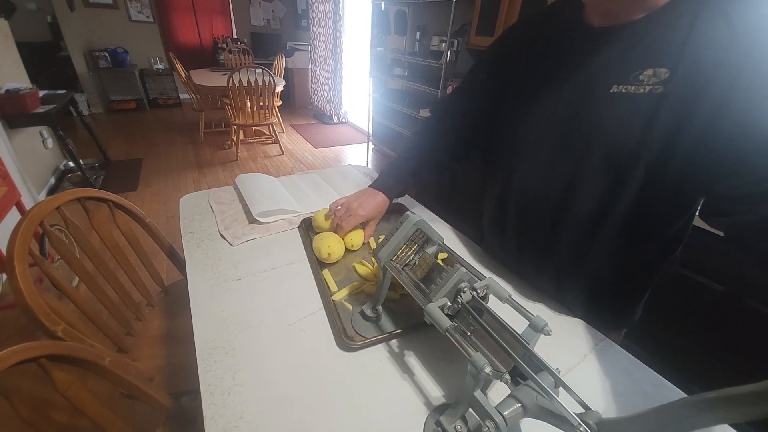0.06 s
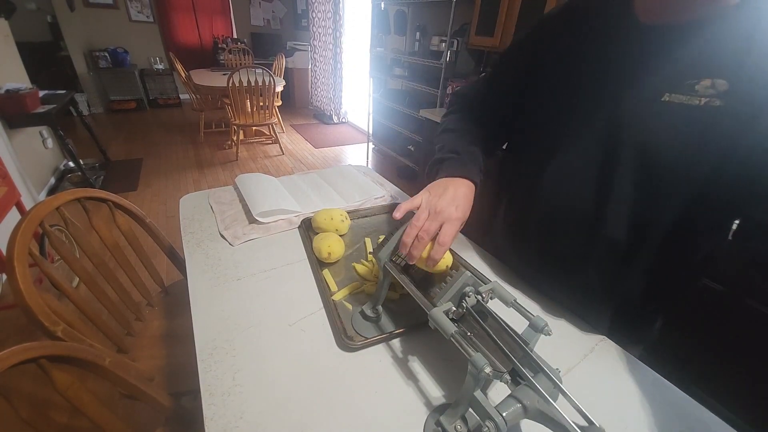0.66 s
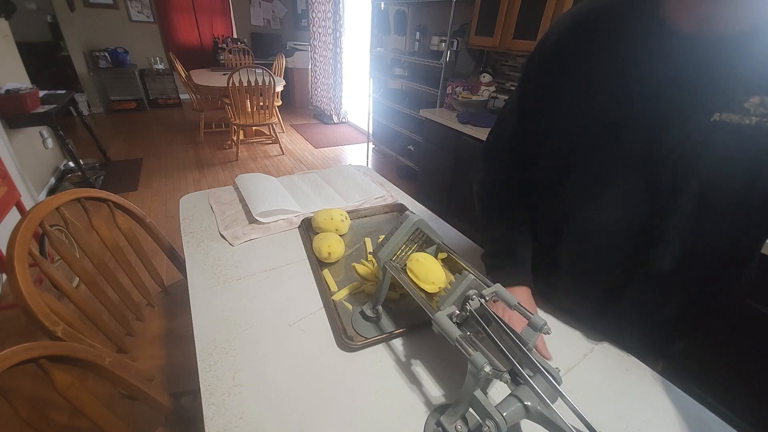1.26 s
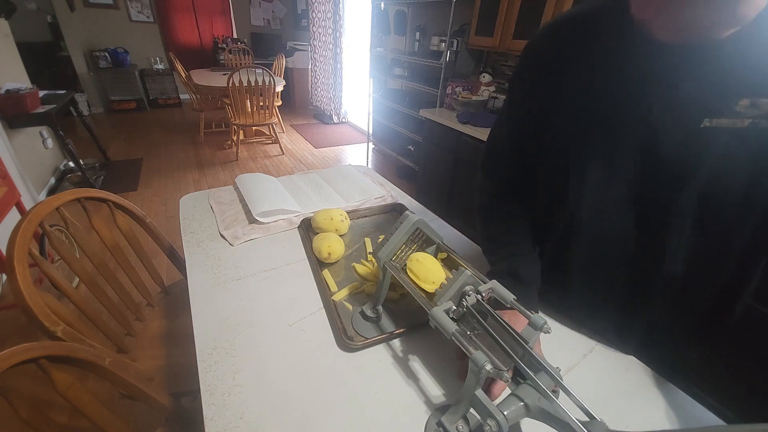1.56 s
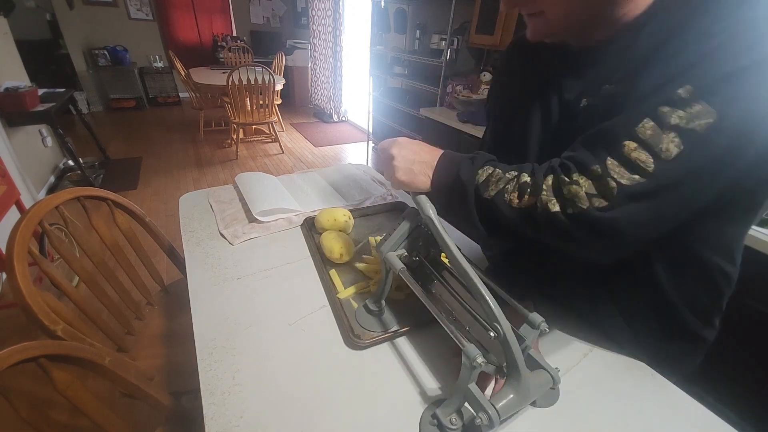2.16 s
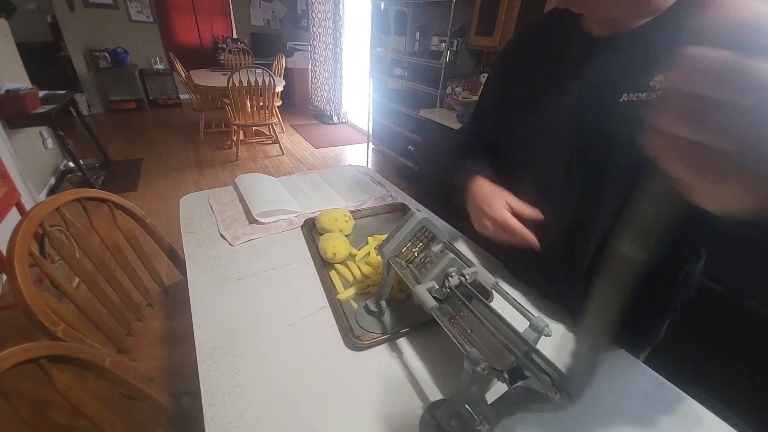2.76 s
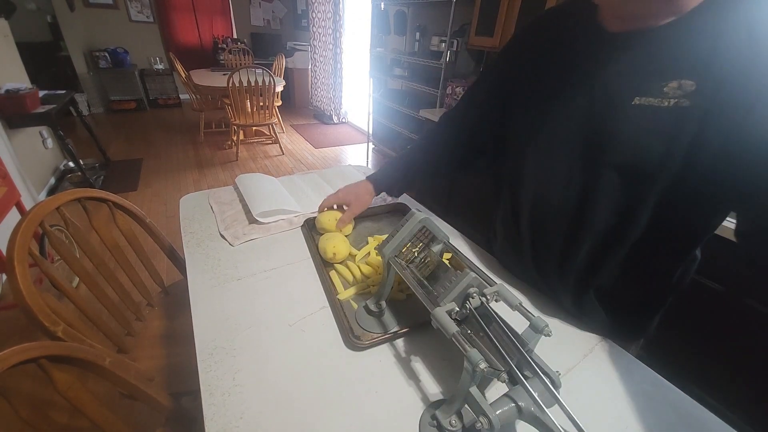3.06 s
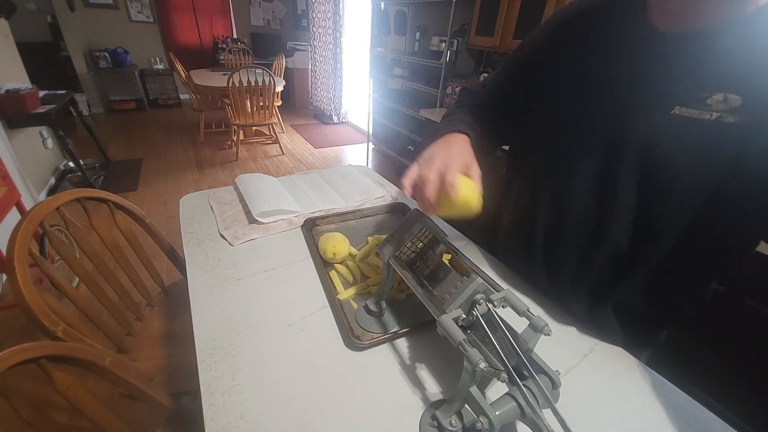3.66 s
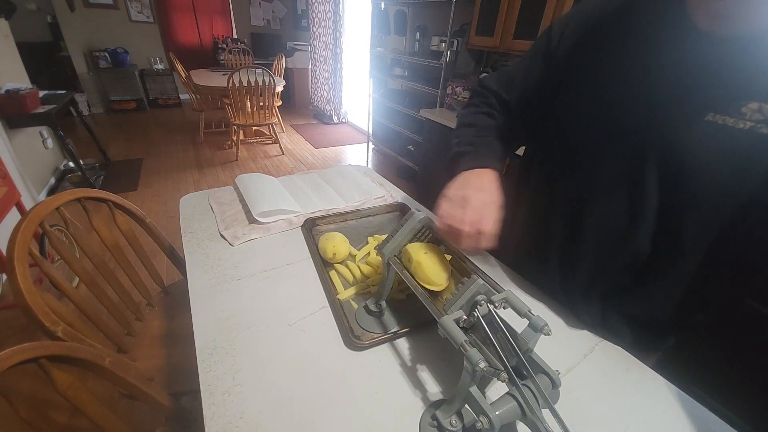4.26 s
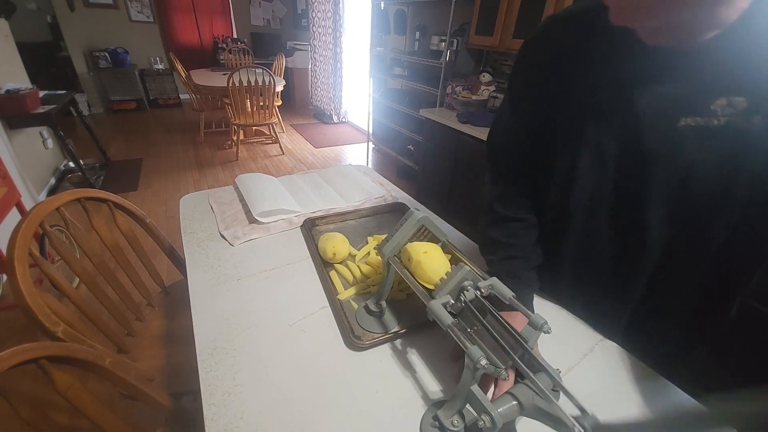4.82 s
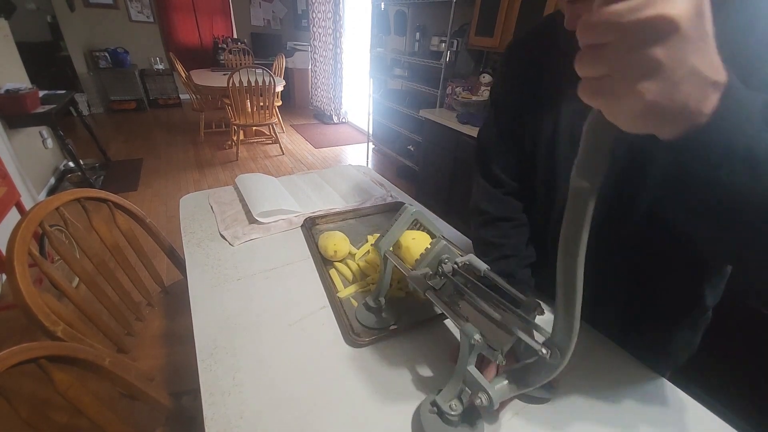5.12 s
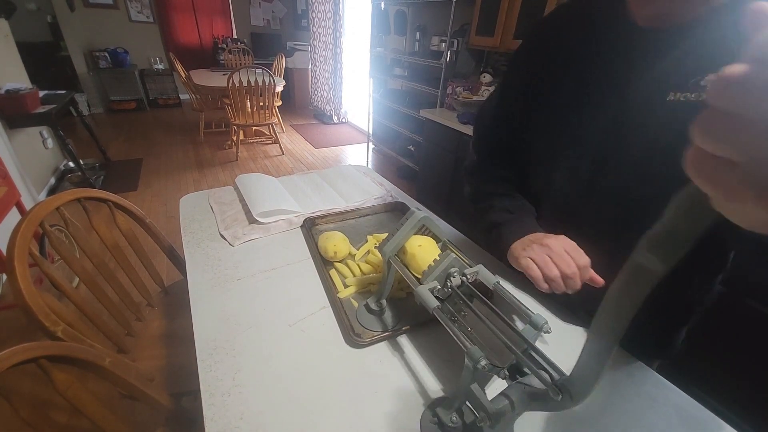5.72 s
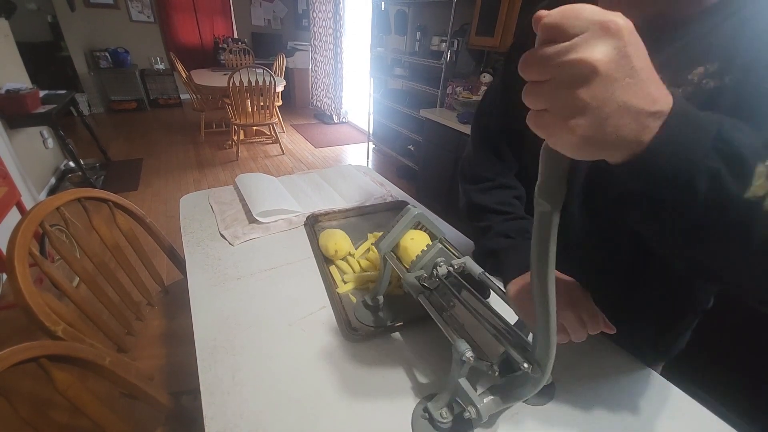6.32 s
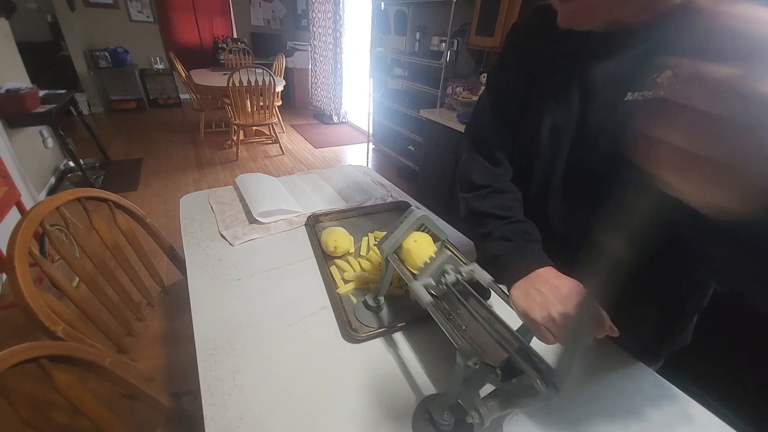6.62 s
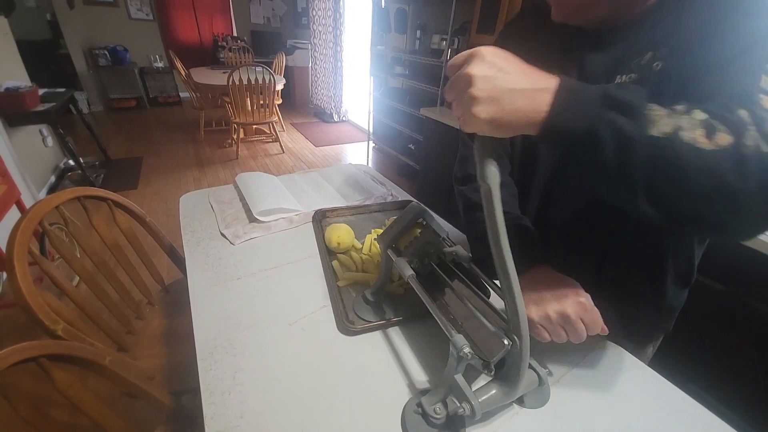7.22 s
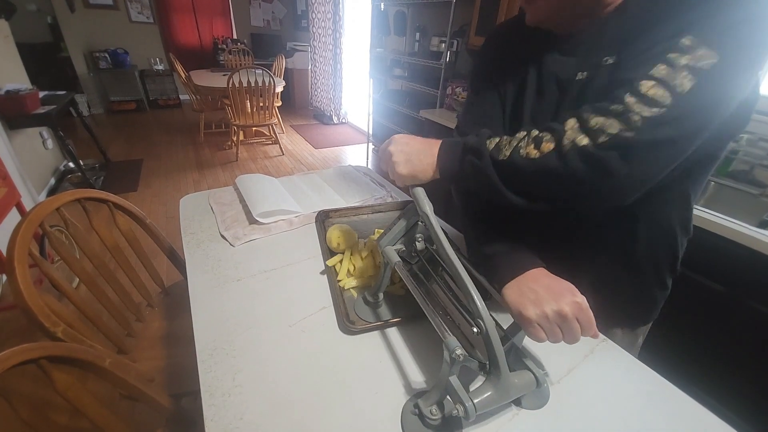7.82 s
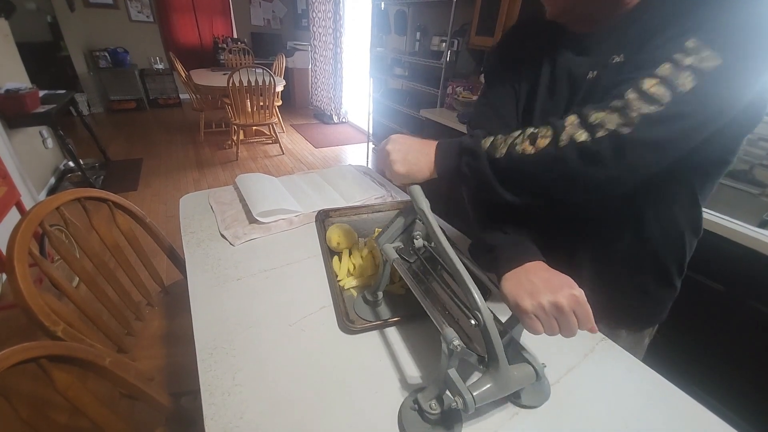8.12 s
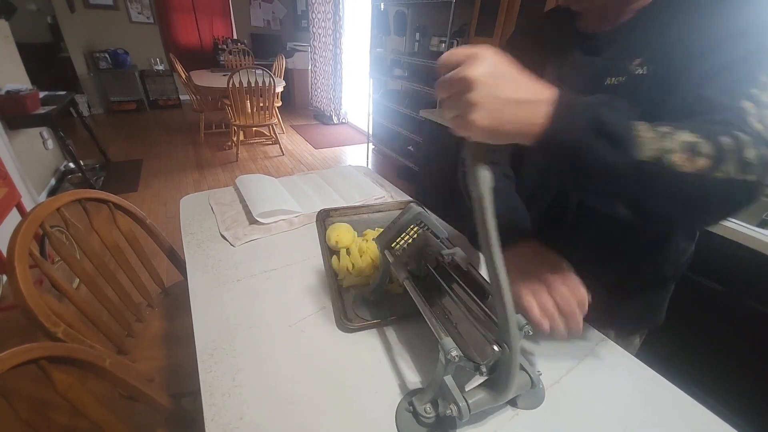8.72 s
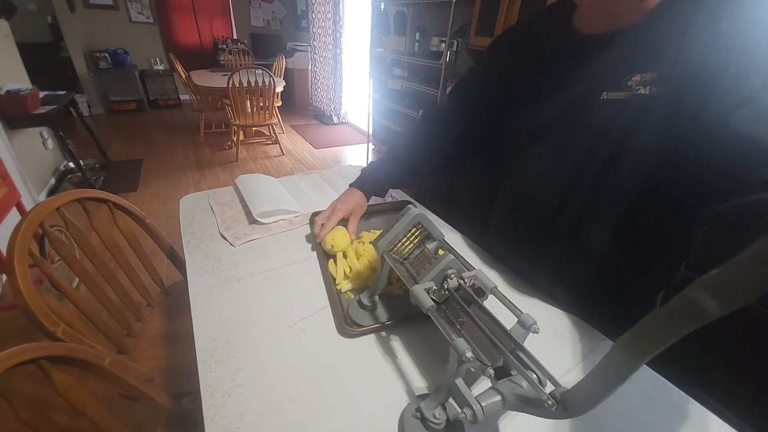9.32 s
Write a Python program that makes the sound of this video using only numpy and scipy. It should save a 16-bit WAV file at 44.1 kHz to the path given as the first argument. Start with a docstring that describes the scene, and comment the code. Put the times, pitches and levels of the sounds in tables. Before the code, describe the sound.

A lever cutter chops raw potatoes with dull knocks, one loud crunching thud, then a run of rattling metal clacks in a kitchen.

```python
"""Lever fry cutter on a kitchen table

Potatoes drop into the trough with dull knocks; the pusher slides on its rods and drives them through the
blade grid, the second one only after a run of jerks on the lever. Each jerk clacks the cast frame,
rattles the loose linkage and thumps the table. Heard close up, with a short kitchen tail."""
import sys
import numpy as np
from scipy import signal
from scipy.fft import rfft, irfft, next_fast_len
from scipy.io import wavfile
from scipy.ndimage import map_coordinates

SR = 44100
rng = np.random.default_rng(int(sys.argv[2]) if len(sys.argv) > 2 else 0)


def unload_audio(sound):
    """Save the sound as a 16-bit wav file, at the path given as the first command line argument."""
    columns = np.transpose(np.atleast_2d(sound))
    # keep every value between -1 and 1, then stretch to whole-number steps
    steps = np.round(np.clip(columns, -1, 1) * 32767)
    wavfile.write(sys.argv[1], SR, steps.astype(np.int16))


N = 418068
AGE = np.arange(SR // 2) / SR  # seconds since a blow

# spectrum of steel on steel: f/Hz, level/dB
STEEL_SPECTRUM = [(60, -22.5), (300, 5.5), (650, -7), (1000, 2), (1500, -2.5), (2300, 0), (3100, -8.5),
                  (5000, -14.5), (8500, -16.5), (10500, -22.5), (15500, -17)]
# hard jerks on the lever: t/s, clack/dB, treble/dB, rattle/dB, flex/Hz, table thump/dB
LEVER_JERKS = [(6.351, -16, -8, -6.5, 1775, -13.5), (6.753, -14, -7.5, -10, 1250, -10),
               (7.102, -13.5, -8.5, -4.5, 1820, -14), (7.467, -17, -9, -2, 1994, -14.5),
               (8.135, -20.5, -11.5, -15, 1410, -14.5), (8.429, -19.5, -13.5, -13.5, 1410, -14)]


def amp(db):
    """Decibels to gain."""
    return 10 ** (np.asarray(db) / 20)


def unit(x):
    """Each channel scaled to rms 1."""
    return x / np.sqrt(np.mean(x ** 2, axis=-1, keepdims=True) + 1e-20)


def blow(x):
    """Each channel scaled to the energy of 10 ms at rms 1."""
    return unit(x) * np.sqrt(SR / 100 / x.shape[-1])


def fade(t60):
    """A decay that loses 60 dB in t60 seconds."""
    return np.exp(-np.log(1000) * AGE / t60)


def along(points, hz):
    """A curve of (f/Hz, value) points, read on a log frequency axis."""
    freqs, values = np.transpose(points)
    return np.interp(np.log(hz + 1), np.log(freqs), values)


def colour(x, points):
    """Minimum-phase EQ through (f/Hz, gain/dB) points."""
    size = 2 * next_fast_len(x.shape[-1] // 2 + 2048)
    cepstrum = irfft(np.log(amp(along(points, np.fft.rfftfreq(size, 1 / SR)))))
    cepstrum[1:size // 2] *= 2
    cepstrum[size // 2 + 1:] = 0
    return irfft(rfft(x, size) * np.exp(rfft(cepstrum)), size)[..., :x.shape[-1]]


def add(track, s, sound):
    """Lay a sound into a track at s seconds."""
    start = round(s * SR)
    track[..., start:start + sound.shape[-1]] += sound[..., :N - start]


def wobble(rate):
    """A smooth random curve, rate knots a second."""
    knots = rng.standard_normal(int(N * rate / SR) + 4)
    return map_coordinates(knots, [np.arange(N) * rate / SR])


def grains(rate, size=len(AGE)):
    """Tiny contacts at random moments, about rate a second, as mid and side."""
    return unit((rng.random(size) < rate / SR) * rng.standard_normal((2, size)))


def slips(rate, spectrum):
    """Friction texture: a stream of tiny slips that flickers in strength."""
    return unit(colour(grains(rate, size=N) * amp(1.3 * wobble(130)), spectrum))


def ring(modes, scatter_db, detune):
    """Damped modes, their strength and pitch scattered anew on each strike."""
    out = np.zeros(len(AGE))
    for hz, db, t60 in modes:
        envelope = amp(db + scatter_db * rng.normal()) * fade(t60)
        pitch = hz * (1 + detune * rng.normal())
        out += envelope * np.sin(2 * np.pi * pitch * AGE + rng.uniform(0, 2 * np.pi))
    return out


def gestures(rows, attack_s, release_db_per_s):
    """Envelope of (t/s, length/s, level/dB) movements: each rises, holds and dies away."""
    t, out = np.arange(N) / SR, np.zeros(N)
    for s, length, db in rows:
        rise = np.clip((t - s) / attack_s, 0, 1)
        out += rise * amp(db - release_db_per_s * np.clip(t - s - length, 0, 2))
    return out


def room_tone():
    """Faint, dark air whose level drifts slowly."""
    # spectrum of the quiet kitchen: f/Hz, level/dB
    air_spectrum = [(30, -12), (60, -8), (1000, -25.5), (3200, -37), (15000, -34)]
    return amp(-72 + wobble(0.98)) * unit(colour(rng.standard_normal((2, N)), air_spectrum))


def kitchen(send):
    """The room's tail, mid and side: decaying noise, new for each third of a second of the action."""
    # reverb time: f/Hz, t60/s
    decay_times = [(100, 0.5), (1500, 0.48), (5000, 0.52), (13000, 0.31)]
    out, step, predelay_s = np.zeros((2, N)), SR // 3, 0.006
    for start in range(0, N, step):
        hz, t, noise = signal.stft(rng.standard_normal((2, 2 * SR // 3)), SR, nperseg=256)
        decay = np.exp(-np.log(1000) * t / along(decay_times, hz)[:, None])
        tail = signal.istft(noise * decay, SR, nperseg=256)[1]
        wet = signal.fftconvolve(send[None, start:start + step], tail / np.linalg.norm(tail[0]), axes=1)
        add(out, start / SR + predelay_s, wet)
    return out


def rod_squeaks():
    """A rod sticks and slips in its guide, on the right: a thin wavering tone with weak overtones."""
    # squeaks of the rods: t/s, length/s, level/dB, f/Hz
    squeaks = [(2.98, 0.032, -42, 5155), (3.061, 0.044, -53, 5160), (4.924, 0.016, -27.5, 1952)]
    t, out = np.arange(N) / SR, np.zeros(N)
    for s, length, db, hz in squeaks:
        phase = 2 * np.pi * hz * t + 0.5 * wobble(90)
        tone = sum(amp(-22 * k) * np.sin((k + 1) * phase) for k in range(3))
        out += tone * gestures([(s, length, db)], attack_s=0.027, release_db_per_s=900)
    return out * np.array([[1], [-0.5]])


def pin_clink():
    """A loose steel pin is struck and rings brightly."""
    # modes of the pin: f/Hz, level/dB, t60/s
    pin_modes = [(4247, -3.5, 0.075), (7000, -4, 0.13), (11510, 7.5, 0.14)]
    # strike on the pin: t/s, level/dB
    strikes = [(5.392, -38.5)]
    out = np.zeros((2, N))
    for s, db in strikes:
        ping = np.array([ring(pin_modes, scatter_db=1, detune=0) for _ in range(2)])
        add(out, s, amp(db) * blow(ping))
    return out


def frame_ring(attack_s):
    """The cast frame's ring, mid and side; load and contact point shift it a little each time."""
    # modes of the frame and trough: f/Hz, level/dB, t60/s
    frame_modes = [(866.5, 4, 0.12), (1101, 6.5, 0.12), (1137, -5, .2), (1387, -8.5, .1),
                   (1713, -14.5, 0.21), (1884, -9.5, 0.098), (1990, -8, .1), (2914, -14, 0.17)]
    ringing = np.array([ring(frame_modes, scatter_db=2.5, detune=0.01) for _ in range(2)])
    return ringing * (1 - fade(attack_s))


def friction():
    """Rubbing, sliding, straining and cutting: each drives its own mix of rumble, scrape and hiss."""
    # a hand rubs potatoes over the tray or into the trough: t/s, length/s, level/dB
    rubs = [(0.65, 0.096, -68.5), (0.74, 0.042, -57.5), (1.0, 0.063, -68), (1.33, 0.19, -75),
            (3.16, 0.069, -66), (4.7, 0.12, -56.5), (9.33, 0.14, -60.5)]
    # the pusher runs along its rods: t/s, length/s, level/dB
    slides = [(1.76, 0.089, -52), (1.85, .04, -46), (2.52, 0.33, -53), (2.88, 0.145, -52), (4.87, .12, -48),
              (5.39, 0.122, -52.5), (8.76, 0.31, -50.5), (9.04, 0.036, -34)]
    # the frame groans as the arm leans on the lever: t/s, length/s, rumble/dB, scrape/dB re rumble
    strains = [(6.267, 1.3, -42.5, -5.5), (7.951, 0.43, -47, -5.5)]
    # the blades shear through a potato: t/s, length/s, level/dB
    cuts = [(1.885, 0.32, -35), (4.98, .06, -37.5), (5.09, 0.023, -44), (7.445, 0.069, -30)]
    # low body of the friction: f/Hz, level/dB
    rumble_spectrum = [(25, -16.5), (60, -1), (100, -15), (205, -0.5), (340, -11.5), (1000, -48)]
    # midrange scrape: f/Hz, level/dB
    scrape_spectrum = [(150, -37), (450, -7), (2000, -4), (3000, -14.5), (9000, -38)]
    # wet hiss of potato flesh: f/Hz, level/dB
    hiss_spectrum = [(1500, -27.5), (3500, 4.5), (7000, -4), (8400, 1.5), (10700, -7), (15500, -4)]
    # zing of the dry steel rods: f/Hz, level/dB
    zing_spectrum = [(1500, -25), (4000, -2), (6800, -10.5), (8400, -1.5), (10500, -18), (15500, -18)]

    rub = gestures(rubs, attack_s=0.041, release_db_per_s=130)
    slide = gestures(slides, attack_s=0.022, release_db_per_s=232.5)
    groan = gestures([row[:3] for row in strains], attack_s=0.027, release_db_per_s=34)
    creaks = [(s, length, db + scrape_db) for s, length, db, scrape_db in strains]
    creak = gestures(creaks, attack_s=0.027, release_db_per_s=232.5)
    # after each jerk the potato creeps on into the grid
    creep = gestures([(s, 0, db - 28) for s, db, *_ in LEVER_JERKS], attack_s=0.034, release_db_per_s=67)
    cut = gestures(cuts, attack_s=0.034, release_db_per_s=174.5) + creep
    rumble_gain = amp(-2.5) * cut + amp(-7) * slide + amp(7.5) * rub + groan
    scrape_gain = cut + slide + amp(-3) * rub + creak
    crunch_gain = amp(-5.5) * cut + amp(-10.5) * rub

    judder = amp(1.8 * wobble(50) - 3)
    broad_scrape = slips(1500, scrape_spectrum)
    damped_frame = frame_ring(attack_s=0.00086) * fade(0.035)  # whatever rubs on the frame also damps it
    grinding = unit(signal.fftconvolve(broad_scrape, damped_frame, axes=1)[:, :N])
    crunch = slips(6000, hiss_spectrum) + 0.75 * slips(60, STEEL_SPECTRUM)  # a few fibres snap louder
    zing = amp(-13.5) * slide * slips(6000, zing_spectrum)
    bite = 0.4 * amp(3.9 * wobble(16))  # the contact wanders between broad scrape and the frame's notes
    scrape = unit(broad_scrape + bite * grinding)
    body = rumble_gain * slips(1400, rumble_spectrum) + scrape_gain * scrape + rub * grinding
    return judder * body + crunch_gain * crunch + zing


def hollow_knocks():
    """Soft knocks on the frame: a swelling push sounds a hollow note, a gritty tick and its ring."""
    # a potato lands, or the lever takes up slack: t/s, level/dB, tick/dB, frame ring/dB
    knocks = [(0.923, -22.5, -28, -9), (1.809, -44.5, -12, -21.5), (3.178, -46, -39, -8),
              (4.073, -15, -27.5, -7), (6.103, -39.5, -41, -18.5), (6.581, -23.5, -19, -10),
              (6.702, -14.5, -13, -7.5), (7.003, -30, -25.5, -15.5), (7.971, -27.5, -3.5, -7.5)]
    out = np.zeros((2, N))
    for s, db, tick_db, ring_db in knocks:
        push = rng.standard_normal((2, len(AGE))) * fade(0.045) * (1 - fade(0.025)) ** 2
        note = blow(colour(push, [(600, -13), (1100, -1.5), (1500, -10), (6000, -40.5)]))
        tick = colour(blow(colour(push, STEEL_SPECTRUM)), [(1500, -4), (5000, 7.5)])
        ringing = blow(frame_ring(attack_s=0.017))
        add(out, s, amp(db) * (amp(-10) * note + amp(ring_db) * ringing + amp(tick_db) * tick))
    return out


def potato_thuds():
    """Wet potato flesh gives a dull, crumbly knock."""
    # potatoes land and split: t/s, level/dB, treble/dB
    thuds = [(0.261, -35, -42), (2.157, 0, -18.5), (2.169, -3.5, -16.5), (4.075, -16.5, -20.5),
             (4.087, -13, -14.5), (4.11, -20, -20), (7.369, -10, -18.5), (7.893, -29, -34),
             (8.582, -19, -31), (9.321, -25, -25.5)]
    # spectrum of struck flesh: f/Hz, level/dB
    flesh_spectrum = [(40, -18.5), (120, -18), (230, 8), (420, 3), (900, 2), (1250, -6.5), (2200, -10),
                      (4000, -16.5), (9000, -29)]
    out = np.zeros((2, N))
    for s, db, treble_db in thuds:
        knock = blow(colour(grains(6000) * fade(0.067) * (1 - fade(0.034)), flesh_spectrum))
        crumble = blow(colour(grains(3000) * fade(0.12) * (1 - fade(0.065)), flesh_spectrum))
        thud = amp(-15.5) * knock + amp(-10.5) * crumble
        add(out, s, amp(db) * colour(thud, [(1200, 0.0075), (3500, treble_db + 15.5)]))
    return out


def table_thumps(cues):
    """The cutter's feet drive the table top, the tray buzzes on it and the whole table sways."""
    # modes of the table top: f/Hz, level/dB, t60/s
    top_modes = [(143.7, -3.5, 0.22), (199, 6.5, 0.11), (210.2, -0.5, 0.26), (257, -0.5, .08),
                 (352, -6.5, 0.21)]
    # the table sways on its legs: f/Hz, level/dB, t60/s
    leg_modes = [(37, -10.5, 0.7), (57.66, -1.5, 0.46), (73.2, -1, 0.35), (98, -9, 0.11)]
    out = np.zeros((2, N))
    for s, db, sway_db in cues:
        top = blow(ring(top_modes, scatter_db=3, detune=0.06) * (1 - fade(0.018)))
        sway = blow(ring(leg_modes, scatter_db=2, detune=0.06) * (1 - fade(0.036)))
        buzz = blow(colour(grains(1300) * fade(0.53), [(60, 1.5), (350, -2), (800, -3.5), (2500, -35.5)]))
        add(out, s, amp(db - 1.5) * (top + amp(-8.5) * buzz))
        add(out, s + 0.009, amp(db + sway_db + 9.5) * sway)  # the legs follow the top
    return out


def steel_crack():
    """The first milliseconds of steel on steel: a bright burst of noise."""
    burst = rng.standard_normal((2, len(AGE))) * fade(0.015) * (1 - fade(0.004))
    return blow(colour(burst, STEEL_SPECTRUM)) * amp([[0], [-3]])


def metal_clacks(cues):
    """Metal meets metal: a crack, the lever's short flex, chatter of the linkage and the frame's ring."""
    out = np.zeros((2, N))
    for s, db, treble_db, rattle_db, flex_hz in cues:
        pitch = flex_hz * np.exp(0.0098 * rng.normal())
        flex = blow(np.sin(2 * np.pi * pitch * AGE) * fade(0.018)) * np.array([[1], [0]])  # mid only
        chatter = blow(colour(grains(1400) * fade(0.11) * (1 - fade(0.051)), STEEL_SPECTRUM))
        hit = amp(-4) * steel_crack() + amp(-5) * flex + amp(rattle_db + 2) * chatter
        hit += amp(-17.5) * blow(frame_ring(attack_s=0.0073))
        # each contact's treble setting makes it duller or brighter
        brightness = [(2500, 0), (4500, treble_db + 11.5), (12000, 1.6 * treble_db + 13)]
        add(out, s, amp(db) * colour(hit, brightness))
    return out


def impact_cues():
    """Cue lists of clacks and thumps: a jerk clacks, then thumps the table; rocking does both at once."""
    # single contacts in the linkage and of the pusher on the grid: t/s, level/dB, treble/dB, flex/Hz
    contacts = [(1.12, -52, 2, 1080), (1.621, -63, -1, 1110), (1.895, -31.5, -22.5, 1290),
                (1.938, -30.5, -15.5, 1900), (2.136, -9, -12.5, 1610), (2.159, -21, -10, 710),
                (2.47, -41, -11, 1630), (4.693, -43, -4.5, 1300), (4.932, -33, -15, 1930),
                (4.991, -33, -7.5, 1700), (5.058, -40, -1, 2550), (5.118, -38.5, 0.5, 2540),
                (5.375, -37.5, -10, 1650), (5.673, -48, -19, 1960), (6.178, -39.5, -18, 1940),
                (6.24, -37, -7, 1820), (6.267, -31.5, -0.5, 1770), (6.329, -28, -23, 1360),
                (6.885, -48.5, 0, 1650), (7.054, -22.5, -7, 1260), (7.315, -34.5, -11, 1750),
                (7.458, -27.5, -3.5, 1460), (7.956, -38, -14.5, 1590), (8.11, -33, -6.5, 1390),
                (8.141, -23.5, -10.5, 1230), (8.391, -29.5, -5, 1530), (8.54, -31.5, -4, 1490),
                (8.756, -40.5, -5, 1600)]
    # hands, potatoes and the pusher bump the table top: t/s, level/dB, sway/dB
    bumps = [(0.732, -39.5, -44), (0.957, -36, -19), (1.311, -45, -20), (1.619, -39.5, -41),
             (1.762, -43, -21), (2.159, -11, -25), (2.47, -37, -18), (3.074, -45, -33), (3.271, -43.5, -26),
             (3.44, -53.5, -29), (3.67, -57, -30), (4.108, -28.5, -15), (4.76, -38, -27),
             (4.993, -34.5, -8.5), (5.118, -41, -0.5), (5.34, -36, -17.5), (7.37, -19.5, -28),
             (7.893, -33.5, -25), (9.06, -28.5, -24)]
    # the cutter rocks back onto its feet: t/s, clack/dB, treble/dB, table thump/dB
    rocks = [(5.39, -35.5, -0.5, -33.5), (5.828, -48, -21.5, -52), (8.266, -25, -8.5, -21),
             (8.533, -29, -9, -20.5)]
    linkage_rattle_db = -7
    thump_lag_s, jerk_sway_db = 0.0049, -15
    rock_flex_hz, rock_sway_db = 1267, -15.5
    clacks = [(s, db, treble_db, linkage_rattle_db, hz) for s, db, treble_db, hz in contacts]
    thumps = list(bumps)
    for s, db, treble_db, rattle_db, hz, thump_db in LEVER_JERKS:
        clacks.append((s, db, treble_db, rattle_db, hz))
        thumps.append((s + thump_lag_s, thump_db, jerk_sway_db))
    for s, db, treble_db, thump_db in rocks:
        clacks.append((s, db, treble_db, linkage_rattle_db, rock_flex_hz))
        thumps.append((s, thump_db, rock_sway_db))
    return clacks, thumps


def scene():
    """Cutter, table and room, mixed as mid and side, then spread to stereo with the bass near centre."""
    # stereo width: f/Hz, side gain/dB
    width = [(110, -24.5), (260, -12), (480, -7), (1100, -4), (4000, 0)]
    clacks, thumps = impact_cues()
    cutter = metal_clacks(clacks) + potato_thuds() + friction() + pin_clink()
    table = table_thumps(thumps)
    soft_contacts = hollow_knocks() + rod_squeaks()
    air = room_tone()
    reverb = kitchen(amp(-6.5) * cutter[0] + amp(-9) * table[0] + amp(-7) * soft_contacts[0])
    mid, side = cutter + table + soft_contacts + reverb + air
    side = colour(side, width)
    return np.array([mid + side, mid - side]) * amp([[0], [-1]])


def record(dry):
    """A soft clip rounds off the highest peaks, and a steep low-pass cuts the very top."""
    ceiling, top_hz = 1.05, 16000
    rounded = dry / (1 + np.abs(dry / ceiling) ** 6) ** (1 / 6)
    size = next_fast_len(N + SR // 2)
    passband = np.fft.rfftfreq(size, 1 / SR) < top_hz
    return irfft(rfft(rounded, size) * passband, size)[:, :N]


dry = scene()
out = record(dry)
unload_audio(out)
```